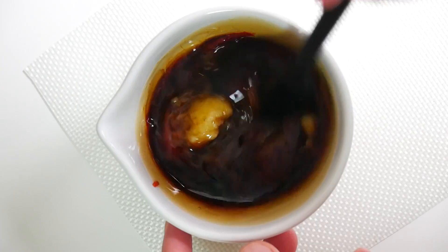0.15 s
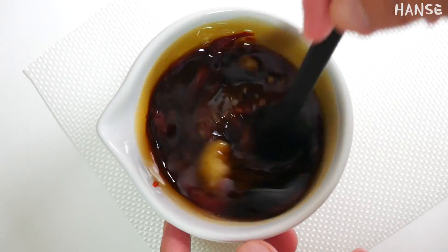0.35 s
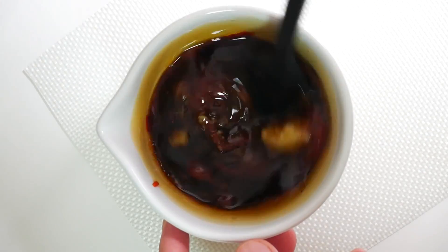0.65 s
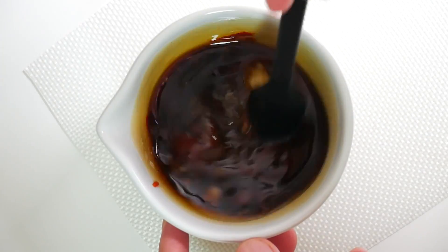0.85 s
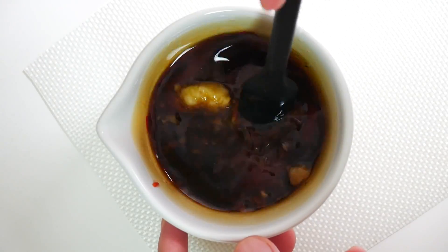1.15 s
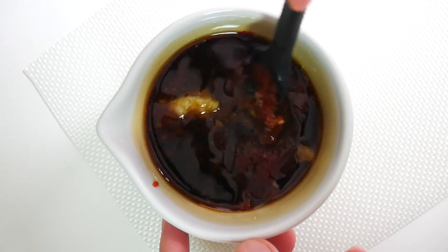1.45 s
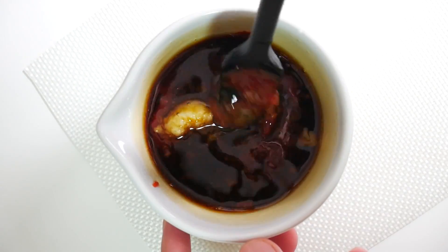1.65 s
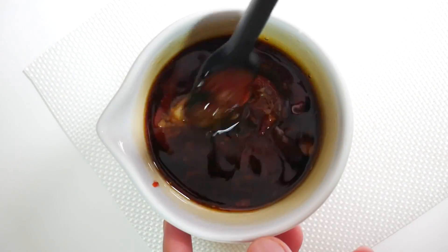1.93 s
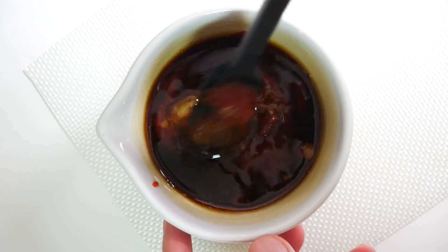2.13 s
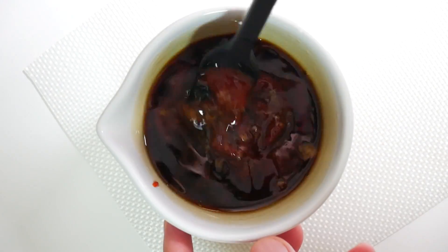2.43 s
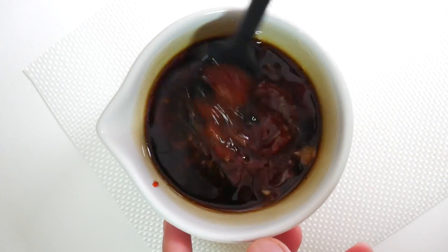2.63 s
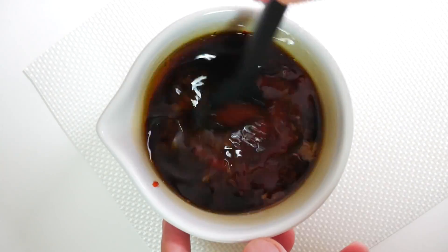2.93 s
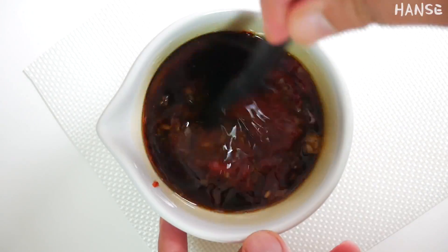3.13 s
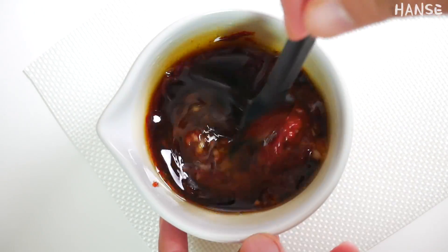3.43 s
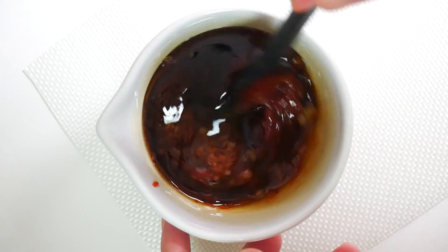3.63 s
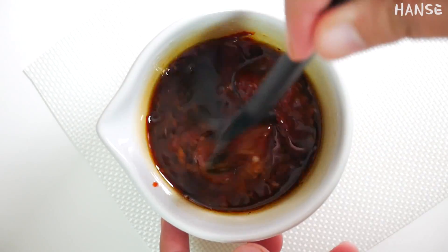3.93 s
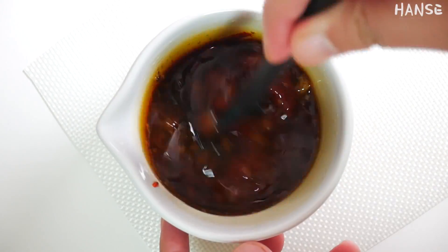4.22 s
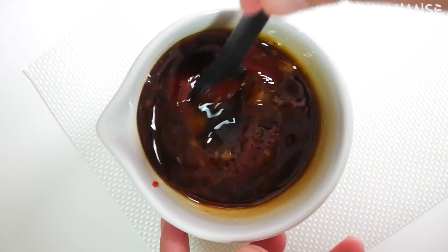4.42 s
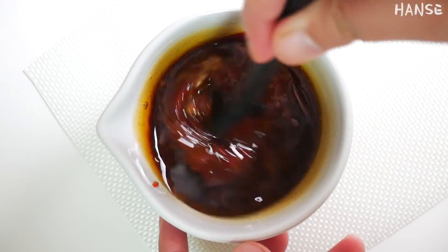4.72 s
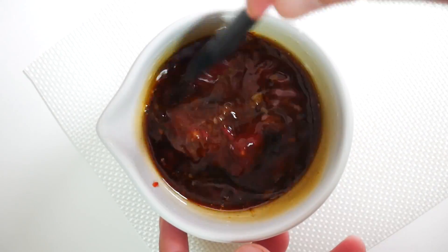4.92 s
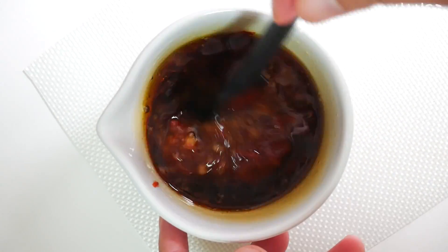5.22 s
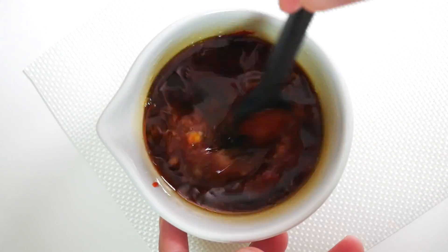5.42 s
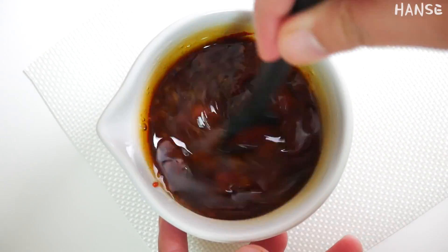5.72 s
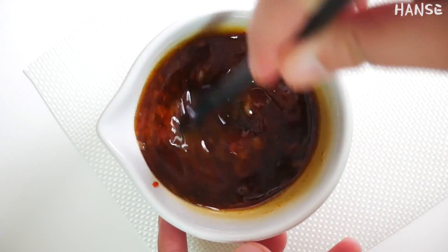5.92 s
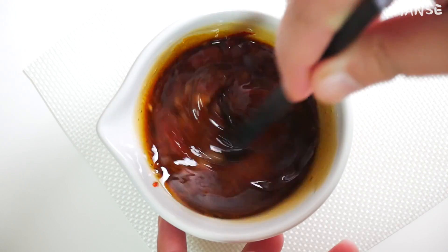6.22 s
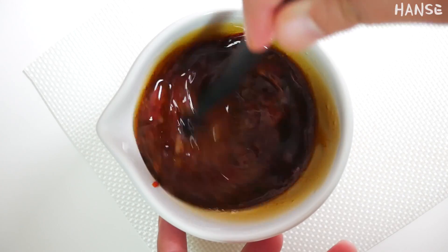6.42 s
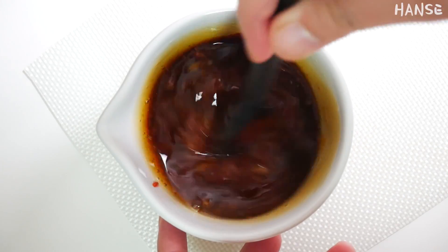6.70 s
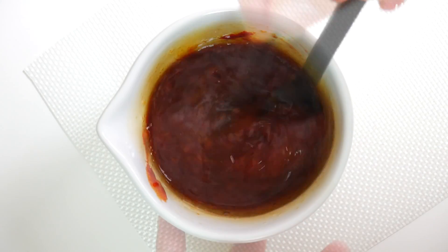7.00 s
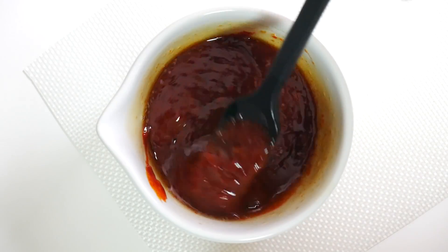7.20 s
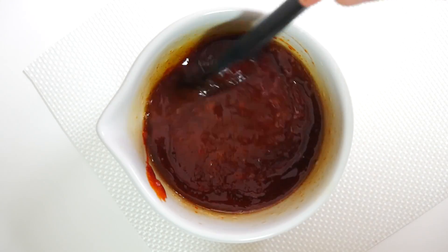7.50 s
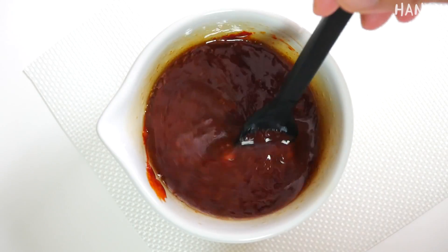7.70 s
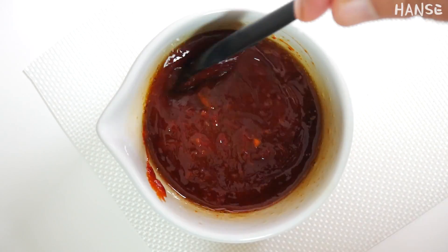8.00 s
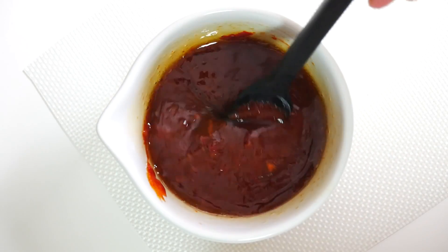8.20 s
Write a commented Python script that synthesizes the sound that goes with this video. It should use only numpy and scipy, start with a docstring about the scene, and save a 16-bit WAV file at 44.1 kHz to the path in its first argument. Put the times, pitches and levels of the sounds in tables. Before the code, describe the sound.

A spoon stirs thick sauce in a small bowl on a table, heard close up for about eight seconds. Soft squelches, sloshes and tiny popping air pockets run over the low drone of the dragging spoon. The first second has several wet pops, the sharpest at about 0.7 seconds. From 1.2 to 1.8 seconds fingers hiss lightly along the handle, followed by a small dry click. Light knocks on the bowl's bottom follow, becoming stronger dull thuds from 3.2 to 5.3 seconds, with a hollow plop at 4.9. The stirring then goes on more softly, with a low slosh near 6.8 seconds and a sharp dry click at 7.1. Two more thuds come at 7.5 and 8.1, with a faint wet squeak between them. Behind it all are quiet room rumble, slight hiss and an occasional brief low hum.

```python
"""A quiet room, close to a small bowl held on a mat on a table: a spoon stirs thick sauce. Knocks on the bottom
ring the table and bowl modes as thuds; the dragging spoon makes them drone. Air pockets pop, and once the bowl
shifts on the mat with a hollow plop; the sauce rustles, squelches, squeaks and sloshes. Fingers hiss along the
handle, and two dry clicks ring briefly. Behind it: room rumble, an occasional low hum, microphone hiss."""
import sys
import numpy as np
from scipy import signal
from scipy.fft import rfft, irfft
from scipy.io import wavfile

SR = 44100
rng = np.random.default_rng(int(sys.argv[2]) if len(sys.argv) > 2 else 0)


def dump(signal):
    """Clip the signal to [-1, 1] and save it as 16-bit WAV at the path in sys.argv[1]."""
    limited = np.clip(np.atleast_2d(signal).T, -1, 1)
    pcm = np.round(limited * 32767).astype(np.int16)
    wavfile.write(sys.argv[1], SR, pcm)


N = 368235

# Room rumble and microphone hiss spectrum: freq_hz, relative_db
ROOM_SPECTRUM = [(15, -13), (25, -5), (49, 1), (76, -6), (263, -14), (489, -20.5), (659, -24.5),
                 (714, -23.5), (818, -25.5), (2220, -32.5), (2610, -32), (13200, -35), (16000, -37)]
# Left-right likeness of that noise: freq_hz, correlation
ROOM_CORRELATION = [(60, 0.45), (180, 0.43), (550, 0.12), (1650, 0.12), (4970, 0.12), (15000, 0.078)]
# Lowest rumble: time_s, level_db
RUMBLE_LEVELS = [(0, -51), (.36, -48), (.7, -45), (.82, -69), (1.53, -70), (2.28, -45.5), (2.5, -51),
                 (3.3, -49), (4.4, -53), (5.3, -48), (5.53, -44), (6.0, -54.5), (6.65, -46.5), (7.4, -58),
                 (7.8, -49), (8.35, -63)]
# Low hum swells: middle_s, length_s, peak_db, pitch_hz
HUM_SWELLS = [(0.361, .55, -36.5, 47.93), (7.661, .2, -39, 49), (8.193, 0.163, -41.5, 50.6)]
# Finger slides on the handle: middle_s, length_s, level_db
FINGER_SLIDES = [(1.198, 0.044, -46.5), (1.228, 0.05, -38), (1.255, 0.043, -43.5), (1.324, 0.11, -48),
                 (1.393, 0.054, -50), (1.471, 0.072, -47), (1.554, 0.093, -40), (1.62, 0.059, -53),
                 (1.671, 0.096, -50.5), (1.728, 0.14, -45), (5.212, 0.041, -53), (6.05, .05, -54)]
# Skin friction spectrum: freq_hz, relative_db
SKIN_SPECTRUM = [(700, -15), (1000, 2), (2000, 5), (4000, 4), (6000, 4.5), (8750, 7), (12000, 6.5),
                 (16000, 2.5)]
# Stirring effort: time_s, drone_db, rustle_db
STIR_LEVELS = [(0, -41, -58.5), (.2, -46.5, -61), (.44, -57, -62), (.72, -40, -56.5), (.93, -53, -62),
               (1.16, -47.5, -59), (1.5, -62.5, -73), (1.72, -53, -63), (2.1, -61.5, -66.5),
               (3.09, -53.5, -62), (3.45, -43.5, -65.5), (3.88, -49.5, -64.5), (4.23, -58, -64.5),
               (4.53, -46, -62), (4.85, -57, -66), (5.2, -47, -67.5), (5.83, -50, -64.5),
               (6.63, -51, -66.5), (6.81, -48.5, -65.5), (7.5, -61.5, -73), (8.35, -56, -71)]
# Sauce folding over, and two low thuds near 6.8 s: middle_s, length_s, level_db, centre_hz
SAUCE_FOLDS = [(0.087, 0.063, -48, 370), (0.777, 0.29, -57, 338), (3.391, 0.084, -41.5, 388),
               (3.831, 0.056, -41, 365), (4.948, 0.092, -44.5, 420), (6.716, 0.12, -47.5, 523),
               (6.774, 0.13, -43.5, 188), (6.817, 0.062, -37, 109)]
# Sauce between spoon and wall: middle_s, length_s, level_db, centre_hz
WALL_SQUELCHES = [(0.126, .027, -59, 2300), (0.181, 0.042, -53, 1620), (0.5, 0.028, -53, 1920),
                  (0.623, 0.042, -57, 1730), (0.738, 0.035, -51, 1900), (0.948, 0.016, -47.5, 1680),
                  (1.095, 0.041, -50, 1690), (1.853, 0.062, -58.5, 1800), (2.33, 0.17, -56.5, 1750),
                  (2.54, 0.051, -52, 1900), (2.74, 0.074, -52, 1850), (2.965, 0.064, -57, 1910),
                  (2.997, 0.044, -56, 2700), (3.183, 0.025, -59, 1900), (3.396, .054, -63, 2200),
                  (4.057, 0.052, -63, 2600), (4.438, 0.11, -58.5, 2350), (4.553, .09, -61, 2750),
                  (4.653, 0.09, -61, 2370), (5.26, 0.058, -58, 2000), (5.309, 0.052, -54, 2040),
                  (5.31, 0.041, -55, 3000), (5.305, 0.03, -56.5, 4340), (5.557, 0.048, -52, 2150),
                  (5.898, 0.071, -54, 2120), (6.047, .041, -61, 2240), (6.169, 0.083, -61, 2400),
                  (8.254, 0.033, -53.5, 2370)]
# Wet squeaks: middle_s, length_s, level_db, centre_hz, width_octaves
WET_SQUEAKS = [(1.323, 0.063, -55, 2930, 0.092), (3.093, 0.14, -57, 5950, 0.083),
               (7.705, 0.05, -51.5, 3740, .45), (7.713, 0.073, -57.5, 2560, .2)]
# Air pockets bursting: start_s, level_db, pitch_hz, t60_s, snap_re_ring_db, left_minus_right_db
AIR_POPS = [(.0668, -32.5, 4030, 0.024, -8, -.5), (0.0688, -33, 1700, 0.007, -13, 2),
            (.1605, -42, 1920, .01, -15, 0), (0.1751, -19, 1540, 0.0066, -17, -2),
            (.1875, -31.5, 7030, 0.0042, 3.5, 1), (.2252, -33.5, 1770, 0.011, -21, .1),
            (.2463, -44, 1540, .008, -12, 0), (0.379, -37, 1780, .01, -15, 0),
            (.4698, -41, 1820, .01, -15, 0), (0.5027, -25.5, 5960, 0.017, -14, -.5),
            (.5601, -44, 1970, .01, -15, 0), (.5921, -37, 1950, .011, -8, -1),
            (.6522, -27, 14200, 0.0055, -6, -2), (0.6757, -10, 1290, 0.0071, -21.5, 0.5),
            (.7357, -40, 1920, .025, -15, 0), (0.9478, -26, 11700, 0.0086, -4, .1),
            (1.0106, -39, 1620, 0.009, -14, 0), (1.122, -41, 9100, .004, 2.5, -1),
            (1.157, -36, 1890, .006, -19, -.5), (1.1614, -30.5, 6930, 0.01, 3, 1),
            (1.226, -34, 1430, .01, 3, 1), (1.8013, -26.5, 2900, 0.0065, -3.5, -2),
            (1.8035, -36, 1490, .014, -20, -1), (1.86, -38, 1810, 0.011, -7, -2),
            (1.9086, -41, 1850, 0.011, -12, -5), (2.2942, -41, 1700, .014, -18, 0),
            (2.3096, -27.5, 1720, 0.011, -19, 2), (2.5125, -26, 12100, 0.0068, -3.5, -3),
            (2.715, -43, 1790, .014, -18, 2), (2.7425, -24.5, 1820, 0.0073, -25, -1),
            (2.795, -42, 3620, 0.019, -4, -.5), (2.7955, -38, 1910, 0.01, -19, 0),
            (3.1852, -25, 1880, 0.01, -20, -1), (3.376, -47, 7500, .005, 1, 0),
            (3.386, -42, 3100, 0.012, -15, 0), (3.4867, -40.5, 8800, 0.0055, 2, -3),
            (3.907, -39, 5620, 0.018, -11, -7), (3.9564, -29, 9200, 0.0069, -4, -2),
            (4.0006, -36, 8200, 0.0061, -7, -1.5), (4.0532, -44, 3170, 0.011, -15, 0),
            (4.258, -36, 2500, .006, -10, 0), (4.2975, -37, 2280, .006, -9, 0),
            (4.3068, -37, 14000, .005, -7, -1.5), (4.5804, -37, 3000, 0.0081, -12, 0),
            (4.585, -44, 2500, .025, -18, -3), (4.658, -44, 2350, .01, -18, 0),
            (4.668, -41, 2350, .01, -20, 0), (4.6803, -45, 4500, .004, 4, 0),
            (5.1833, -41, 8650, .004, 0, -1), (5.2056, -38.5, 6900, 0.0077, -4, -.5),
            (5.8193, -36, 2000, 0.0071, -11, -1), (5.8496, -42, 1870, .008, -12, 0),
            (5.8625, -37, 2270, 0.011, -15, 0), (7.57, -44, 7640, .0043, 6, -1),
            (8.248, -35.5, 2420, 0.0079, -8, -1)]
# Bowl shifting on the mat, one row a pitch: # start_s, level_db, pitch_hz, t60_s, snap_re_ring_db, snap_low_hz,
# snap_high_hz, left_minus_right_db
PLOP_MODES = [(4.917, -22, 330, 0.036, -26, 390, 1100, 6), (4.916, -25.5, 680, 0.029, -21, 530, 730, 4)]
# Dry clicks, as of spoon on rim: start_s, level_db, left_minus_right_db
DRY_CLICKS = [(1.8038, -21, 5.5), (7.0712, -6, 2)]
# Ring of a click: pitch_hz, gain_db, delay_s, t60_s, snap_re_ring_db, snap_low_hz, snap_high_hz
CLICK_MODES = [(2750, -22.5, 0.00031, 0.0055, -6.5, 1650, 4900),
               (8260, 4.5, 0.0003, 0.0048, -12, 5900, 11400), (9580, -2, 0.0009, 0.0035, -19, 13000, 21000),
               (11100, -12, 0.0009, 0.003, -22, 9600, 14000)]
# Table and bowl modes (negative gain = opposite motion): pitch_hz, t60_s, left_gain, right_gain
TABLE_MODES = [(44.5, 0.66, -0.047, 0.0043), (72, 0.11, -0.11, -0.093), (95, 0.15, -0.22, -0.14),
               (101.7, 0.1, 0.24, 0.034), (146.8, 0.34, 0.066, 0.025), (158.6, 0.17, 0.057, 0.058),
               (190.9, 0.27, 0.014, 0.065), (267, 0.19, 0.21, 0.072), (292.7, 0.17, 0.087, 0.19),
               (348.5, 0.28, 0.067, 0.062), (387, 0.076, 0.025, 0.14), (520, 0.079, 0.095, 0.13),
               (569, 0.11, -0.069, -0.078), (660, 0.12, -0.055, -0.028)]
# Spoon on the bowl's bottom: start_s, push_db, tap_re_push_db
SPOON_KNOCKS = [(0.4024, -18, -18), (1.2289, -14.5, -15.5), (1.86, -14, -15), (1.9108, -25, -12),
                (2.0992, -17, -12.5), (2.1485, -23, -14), (2.3073, -13.5, -3.5), (2.374, -19, -16),
                (2.5462, -11.5, -9), (2.7453, -13.5, -6), (2.8217, -18.5, -14), (2.96, -17.5, -7),
                (3.05, -18, -19), (3.1837, -2, -20), (3.2358, -16, -30), (3.3846, 1.8, -21),
                (3.4487, -15.5, -12), (3.604, 1, -19), (3.68, -15.5, -16), (3.8144, 1.3, -18),
                (3.8947, -10.5, -19.5), (4.0535, -6, -16.5), (4.1137, -18, -20), (4.2417, -2.5, -17.5),
                (4.808, -15, -17), (5.007, -0.3, -41), (5.0613, -24, -4.5), (5.249, -2, -36),
                (5.318, -12, -25), (5.5174, -14.5, -20), (6.9913, -23, -28), (7.522, -8.5, -17),
                (7.783, -24, -18), (8.082, -8.5, -17), (8.246, -24, -4.5)]


def from_db(db):
    """Decibels to gain."""
    return 10 ** (np.asarray(db) / 20)


def unit_rms(x):
    """Scale to rms 1."""
    return x / np.sqrt(np.mean(x ** 2) + 1e-20)


def pan(left_minus_right_db):
    """Left and right gains."""
    return from_db(np.array([[.5], [-.5]]) * left_minus_right_db)


def curves(rows):
    """Breakpoint columns, interpolated per sample."""
    times_s, *columns = np.transpose(rows)
    return [np.interp(np.arange(N) / SR, times_s, column) for column in columns]


def ring(x, pitch_hz, t60_s):
    """Resonator: a unit click starts a decaying sine of height 1."""
    radius, angle = from_db(-60 / (t60_s * SR)), 2 * np.pi * pitch_hz / SR
    return signal.lfilter([0, np.sin(angle)], [1, -2 * radius * np.cos(angle), radius ** 2], x + 1e-18)


def butter(x, kind, edge_hz, order=2):
    """Maximally flat filter."""
    return signal.sosfilt(signal.butter(order, edge_hz, kind, fs=SR, output="sos"), x)


def band(x, low_hz, high_hz):
    """Band-pass, rms 1."""
    return unit_rms(butter(x, "band", [low_hz, high_hz]))


def stereo_noise(spectrum, correlation):
    """Noise of given spectrum and left-right correlation, rms 1."""
    log_hz = np.log(np.maximum(np.fft.rfftfreq(N, 1 / SR), 1))

    def per_bin(points):
        freq_hz, values = np.transpose(points)
        return np.interp(log_hz, np.log(freq_hz), values)

    mid, side = rfft(rng.standard_normal((2, N)))
    alike = np.clip(per_bin(correlation), 0, 1)
    channels = np.sqrt(1 + alike) * mid + np.sqrt(1 - alike) * side * [[1], [-1]]
    return unit_rms(irfft(from_db(per_bin(spectrum)) * channels, N))


def grains(per_s, spread_db):
    """Random clicks of uneven size and sign."""
    sizes = from_db(spread_db * np.minimum(rng.exponential(1, N), 5)) * rng.choice([-1, 1], N)
    return sizes * (rng.random(N) < per_s / SR)


def swell(middle_s, length_s):
    """Sample span and shape of a rise and fall."""
    shape = np.hanning(int(max(length_s, .01) * SR))
    start = int(middle_s * SR) - len(shape) // 2
    return slice(start, start + len(shape)), shape


def room_noise():
    """Steady room rumble and microphone hiss, plus a wavering low band."""
    noise = stereo_noise(ROOM_SPECTRUM, correlation=[(30, 0.66), (60, 0.67)])
    rumble = from_db(curves(RUMBLE_LEVELS)[0]) * band(noise, 36.5, 57.3) * pan(1.6)
    return rumble + from_db(-45.5) * stereo_noise(ROOM_SPECTRUM, ROOM_CORRELATION)


def hum():
    """Swells of a low sine, stronger on the left."""
    out = np.zeros(N)
    for middle_s, length_s, peak_db, pitch_hz in HUM_SWELLS:
        span, shape = swell(middle_s, length_s)
        out[span] += from_db(peak_db) * shape * np.sin(2 * np.pi * pitch_hz * np.arange(len(shape)) / SR)
    return out * pan(3)


def wall_reflections(x, echo_s=.0092, echo_db=-20, tail_t60_s=0.14, tail_db=-14):
    """One near echo and a short diffuse tail per microphone, treble dulled."""
    t = np.arange(SR // 3) / SR
    response = rng.standard_normal((2, len(t))) * from_db(-60 * t / tail_t60_s) * (t > .002)
    response *= from_db(tail_db) / np.linalg.norm(response, axis=1, keepdims=True)
    response[:, int(echo_s * SR)] += from_db(echo_db)
    return butter(signal.fftconvolve(x, response, axes=1)[:, :N], "low", 13000, order=1)


def fingers():
    """Skin sliding on the handle: broadband hiss."""
    envelope = np.zeros(N)
    for middle_s, length_s, level_db in FINGER_SLIDES:
        span, shape = swell(middle_s, length_s)
        envelope[span] += from_db(level_db) * shape
    return envelope * stereo_noise(SKIN_SPECTRUM, correlation=[(1000, 0.7), (16000, 0.17)])


def rustle(level_db, bowl_hz=1900, t60_cycles=11.7):
    """Tiny pockets ring a few cycles each, loudest near the pitch the bowl favours."""
    pitches_hz = np.geomspace(1200, 4300, num=14)
    gains = from_db(-8.0 * np.abs(np.log2(pitches_hz / bowl_hz)))
    pockets = grains(per_s=2700, spread_db=2.5)
    pitch_index = rng.integers(0, len(pitches_hz), N)
    rings = sum(gains[k] * ring(pockets * (pitch_index == k), hz, t60_cycles / hz)
                for k, hz in enumerate(pitches_hz))
    return from_db(level_db) * unit_rms(rings)


def rupture_swells(rows, per_s, spread_db):
    """Tiny ruptures in the sauce, band-passed, swelling with each stroke."""
    out, ruptures = np.zeros(N), grains(per_s, spread_db)
    for middle_s, length_s, level_db, centre_hz, width_octaves in rows:
        span, shape = swell(middle_s, length_s)
        edge_ratio = 2 ** (width_octaves / 2)
        with_lead_in = ruptures[max(span.start - SR // 20, 0):span.stop]   # band rings before the swell
        crackle = band(with_lead_in, centre_hz / edge_ratio, centre_hz * edge_ratio)
        out[span] += from_db(level_db) * shape * crackle[-len(shape):]
    return out


def slosh(drone_db, width_octaves=0.75):
    """Sauce folding over: low swells on a bed that partly follows the drone's level."""
    bed_db = -64 + 0.43 * (drone_db - drone_db.mean())
    bed = from_db(bed_db) * band(grains(per_s=900, spread_db=3.0), 314, 605)
    folds = [(*row, width_octaves) for row in SAUCE_FOLDS]
    return bed + rupture_swells(folds, per_s=1300, spread_db=1.5)


def squelches_and_squeaks(squelch_octaves=0.45):
    """Sparse ruptures between spoon and wall squelch; dense ones squeak."""
    strokes = [(*row, squelch_octaves) for row in WALL_SQUELCHES]
    squelches = rupture_swells(strokes, per_s=310, spread_db=1.0)
    return squelches + rupture_swells(WET_SQUEAKS, per_s=3500, spread_db=2.0)


def bursts(rows, spray_decay_s, open_s, crack_db):
    """A pocket opens and rings; its film snaps with one crack and a short spray."""
    out, t = np.zeros((2, N + SR)), np.arange(SR // 10) / SR
    opening = 1 - np.exp(-(t / open_s) ** 4)
    tear = signal.unit_impulse(len(t), int(open_s * SR))
    for start_s, level_db, pitch_hz, t60_s, snap_db, low_hz, high_hz, pan_db in rows:
        tone = np.sin(2 * np.pi * pitch_hz * t) * from_db(-60 * t / t60_s)
        spray = np.exp(-t / spray_decay_s) * band(rng.standard_normal(len(t)), low_hz, high_hz)
        crack = band(tear, low_hz, high_hz)
        snap = from_db(snap_db) * (opening * spray + from_db(crack_db) * crack / np.abs(crack).max())
        start = int(start_s * SR)
        out[:, start:start + len(t)] += from_db(level_db) * pan(pan_db) * (opening * tone + snap)
    return out[:, :N]


def pops_and_clicks(snap_low_ratio=0.42, snap_high_hz=15600):
    """Air pockets ring at one pitch, dry clicks at four; little bass in either."""
    pops = [(start_s, level_db, hz, t60_s, snap_db, snap_low_ratio * hz, snap_high_hz, pan_db)
            for start_s, level_db, hz, t60_s, snap_db, pan_db in AIR_POPS]
    clicks = [(start_s + delay_s, level_db + gain_db, hz, t60_s, *snap, pan_db)
              for start_s, level_db, pan_db in DRY_CLICKS
              for hz, gain_db, delay_s, t60_s, *snap in CLICK_MODES]
    return butter(bursts(pops + clicks, spray_decay_s=0.00095, open_s=0.0005, crack_db=8.0), "high", 500)


def plop():
    """The bowl shifts on the mat: hollow, two pitches."""
    collapse = bursts(PLOP_MODES, spray_decay_s=0.028, open_s=0.0013, crack_db=-5.0)
    return butter(collapse, "low", 1100, order=4)


def table_response(force):
    """Force on the bowl rings every mode, differently at each microphone."""
    return sum(ring(force, hz, t60_s) * [[left], [right]] for hz, t60_s, left, right in TABLE_MODES)


def spoon_drag(level_db):
    """Small random jolts of stirring keep the table droning."""
    force = band(grains(per_s=250, spread_db=5.5), 77, 226)
    return from_db(level_db) * unit_rms(table_response(force))


def spoon_knocks(push_s=0.00491, tap_s=0.0013):
    """A soft push through the sauce plus a short contact tap sets the table thudding."""
    start_s, push_db, tap_re_push_db = np.transpose(SPOON_KNOCKS)
    force = np.zeros(N)
    for length_s, level_db in ((push_s, push_db), (tap_s, push_db + tap_re_push_db)):
        impulses, pulse = np.zeros(N), np.hanning(int(length_s * SR))
        impulses[(start_s * SR).astype(int)] = from_db(level_db)
        force += np.convolve(impulses, pulse / pulse.sum())[:N]
    return table_response(force)


def scene():
    """Stereo mix; only the bright sources reflect off the walls."""
    drone_db, rustle_db = curves(STIR_LEVELS)
    stirring = spoon_drag(drone_db) + slosh(drone_db)
    bright = rustle(rustle_db) + squelches_and_squeaks() + pops_and_clicks() + fingers()
    thuds = plop() + spoon_knocks()
    return room_noise() + hum() + wall_reflections(bright) + bright + stirring + thuds


def record(dry):
    """Steep low-pass at 16 kHz."""
    return signal.sosfilt(signal.ellip(10, .5, 60, 16000, fs=SR, output="sos"), dry)


dry = scene()
out = record(dry)
dump(out)
```